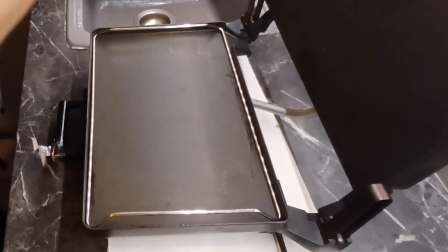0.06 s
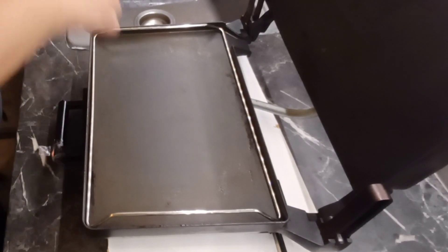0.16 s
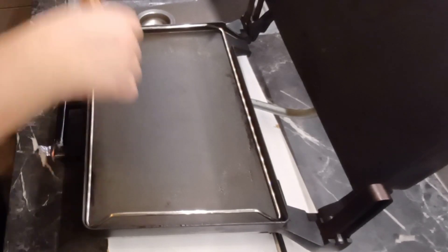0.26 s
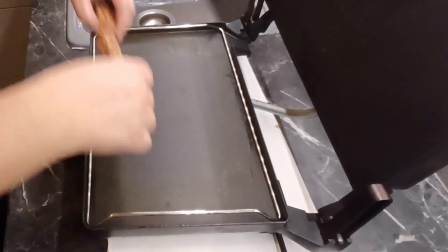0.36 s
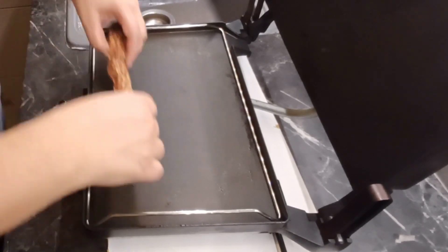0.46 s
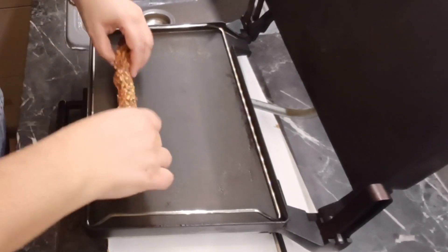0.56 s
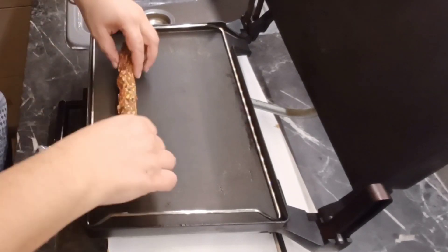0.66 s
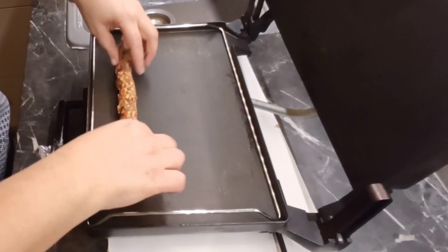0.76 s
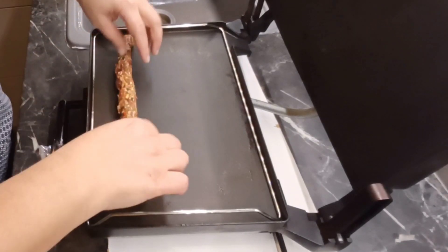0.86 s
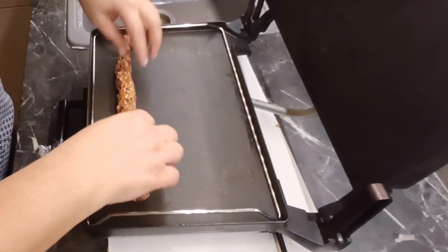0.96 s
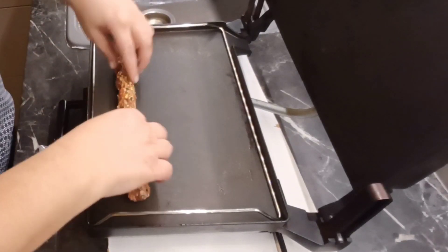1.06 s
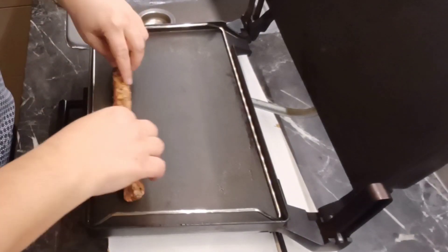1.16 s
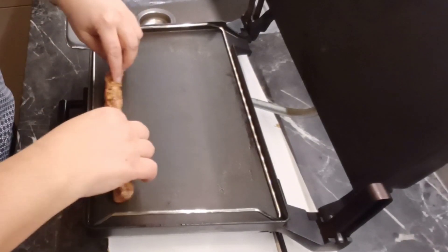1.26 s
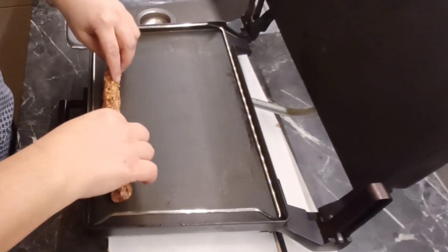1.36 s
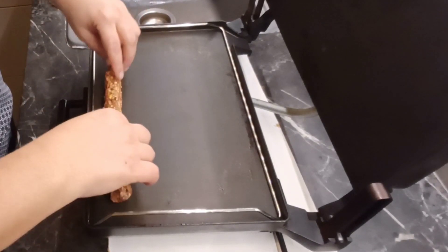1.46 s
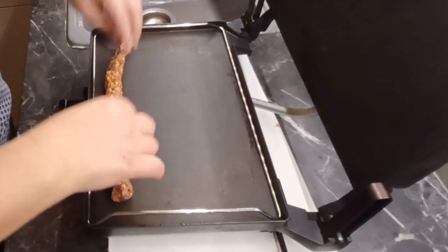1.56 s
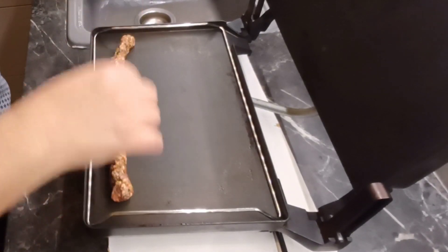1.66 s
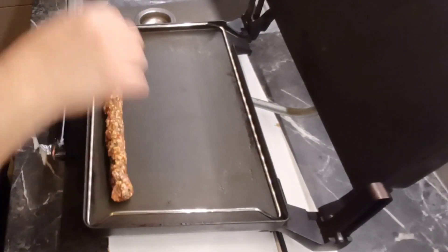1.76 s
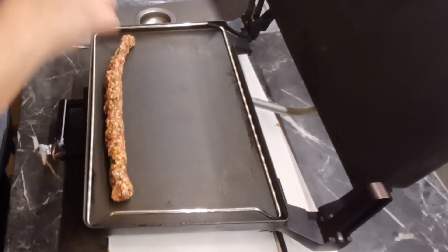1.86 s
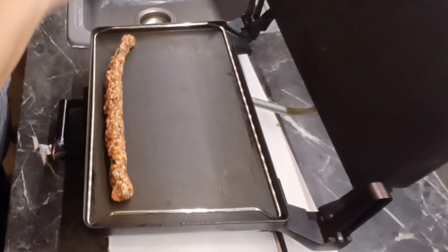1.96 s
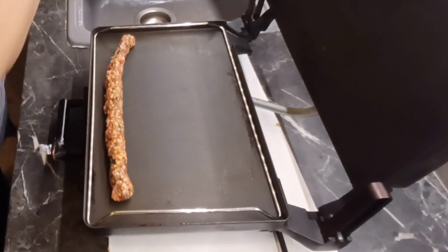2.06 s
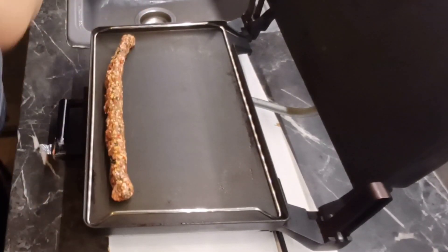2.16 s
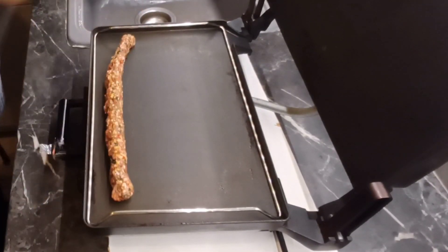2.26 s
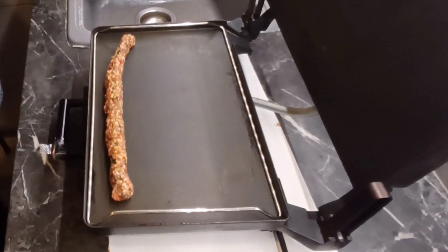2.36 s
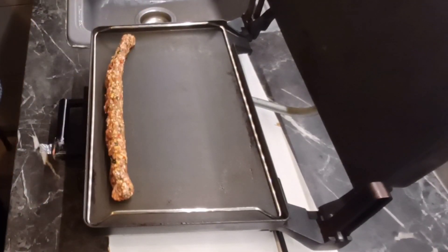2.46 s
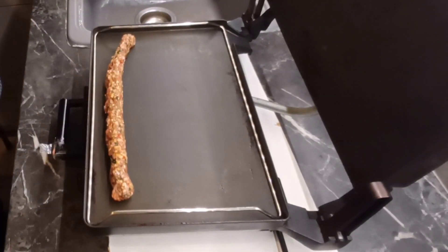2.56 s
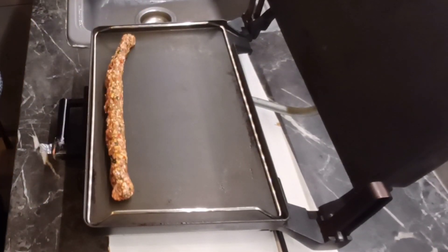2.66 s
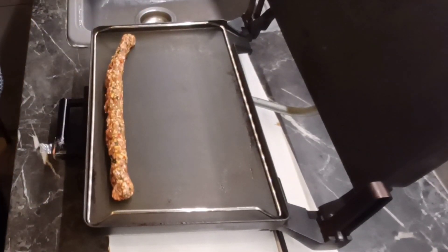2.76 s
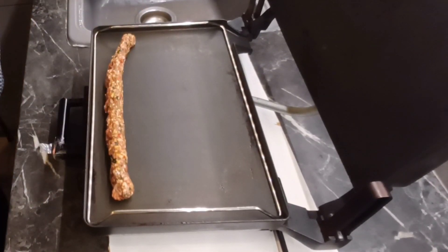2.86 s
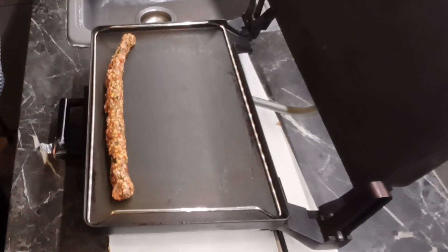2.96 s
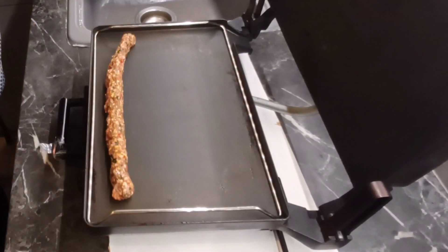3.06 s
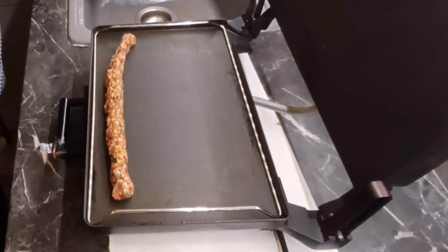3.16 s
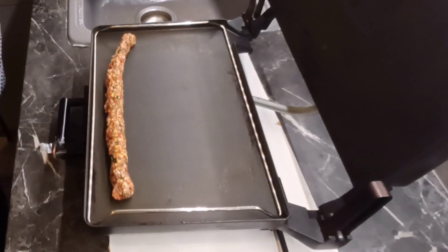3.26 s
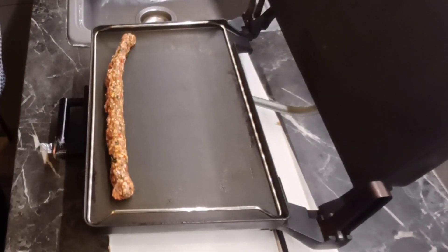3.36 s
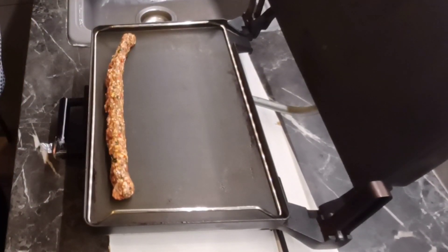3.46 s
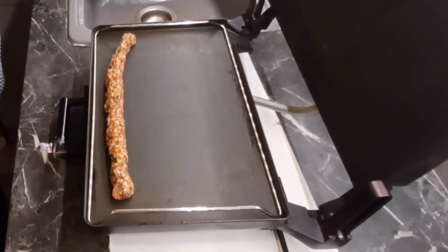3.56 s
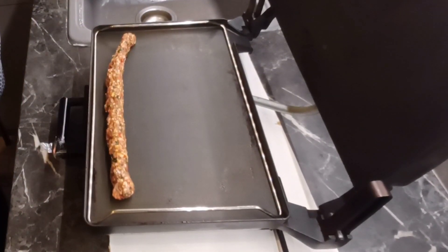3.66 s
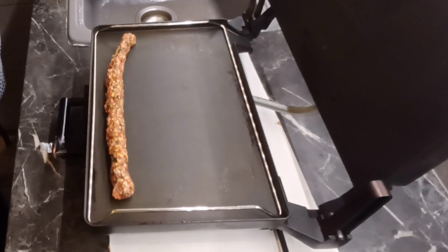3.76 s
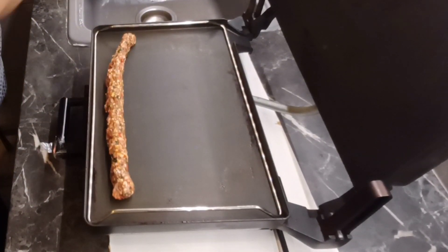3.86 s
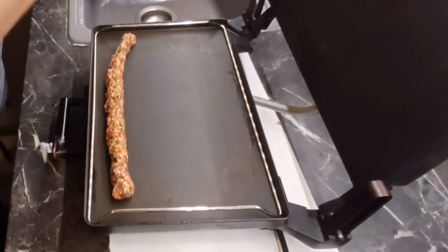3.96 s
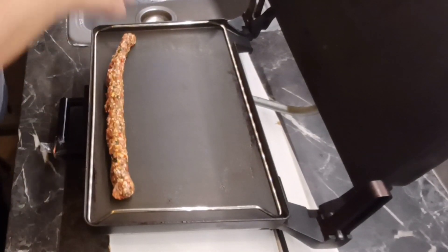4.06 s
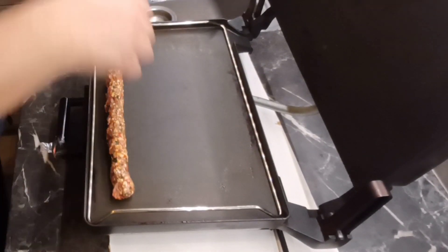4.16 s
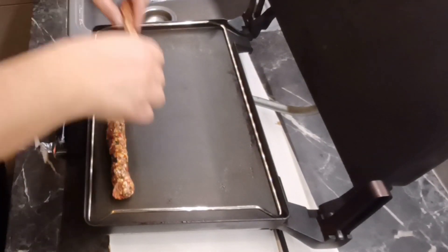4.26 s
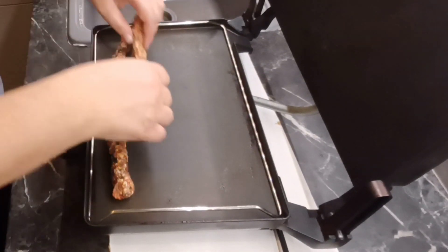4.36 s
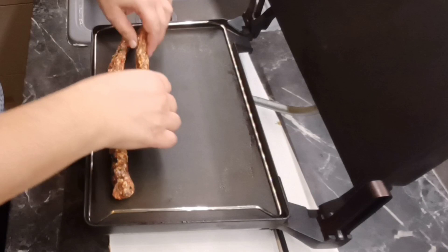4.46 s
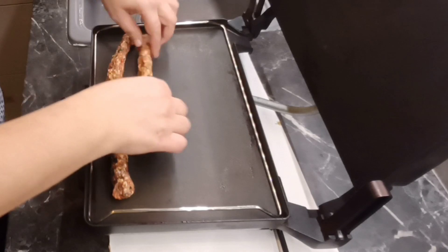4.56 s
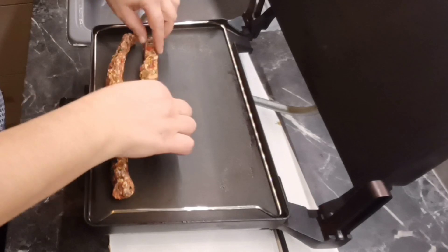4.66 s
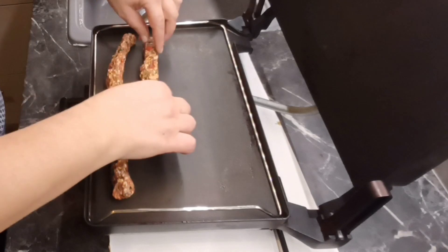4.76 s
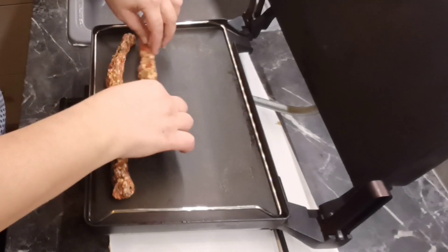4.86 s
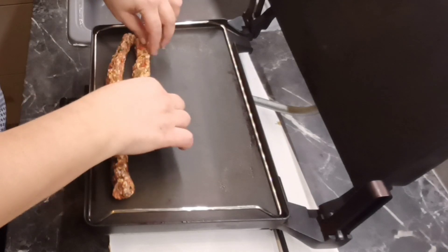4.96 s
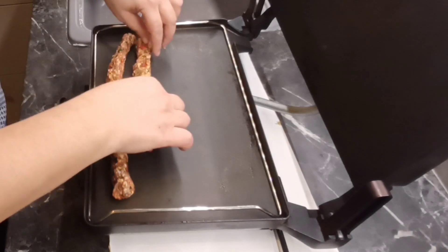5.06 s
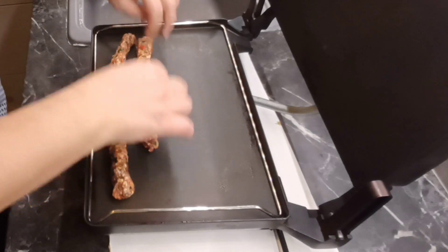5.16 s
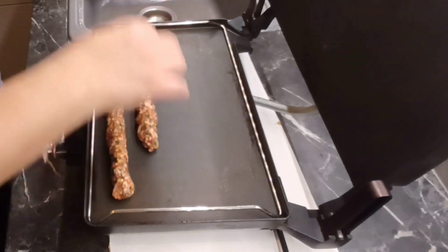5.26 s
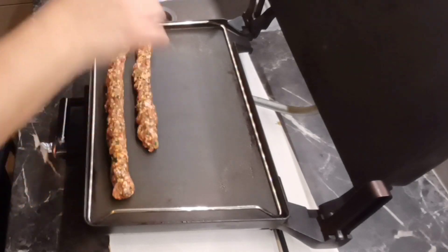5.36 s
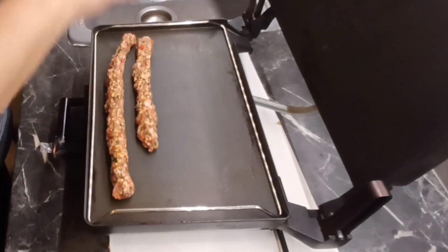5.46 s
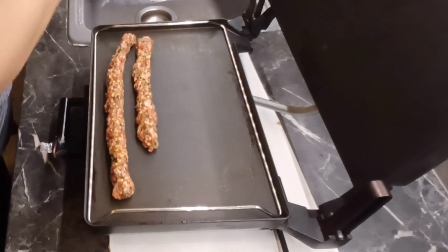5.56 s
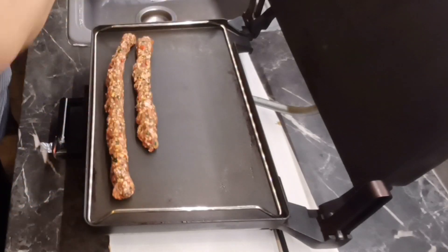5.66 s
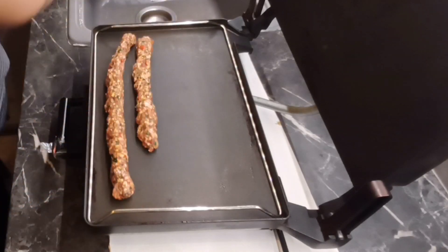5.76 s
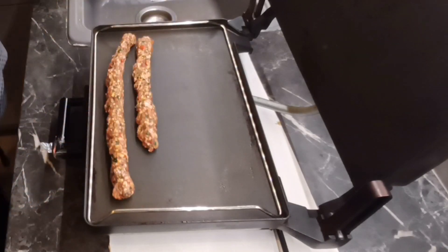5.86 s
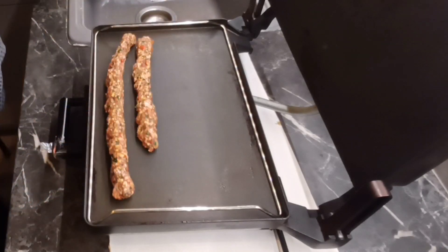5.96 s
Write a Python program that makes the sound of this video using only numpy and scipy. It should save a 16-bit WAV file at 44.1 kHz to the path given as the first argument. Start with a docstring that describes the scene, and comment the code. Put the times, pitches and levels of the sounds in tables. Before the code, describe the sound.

Near silence, then raw minced meat touches a hot grill plate and a bright, crackling sizzle swells, growing fuller as a second roll is laid.

```python
"""Minced meat on a hot grill

Two rolls of raw minced meat are laid on the hot flat plate of an electric grill in a quiet kitchen.
Thousands of tiny steam bursts, coloured and swelling as each roll is laid, make the sizzle; sharp bursts
and lower ticks make the pops and fat snaps. Hands press the meat: rounded low thuds and thin held tones.
Shaped noise gives the kitchen air, a grill murmur that follows the boil, and a few faint rustles.
"""
import sys
import numpy as np
from scipy import signal
from scipy.fft import rfft, irfft
from scipy.io import wavfile
from scipy.ndimage import uniform_filter1d

SR = 44100
rng = np.random.default_rng(int(sys.argv[2]) if len(sys.argv) > 2 else 0)


def log_audio(samples):
    """Write samples as a 16-bit WAV file to the path given in sys.argv[1]."""
    # one column per channel
    frames = np.atleast_2d(samples).T
    # limit to full scale, then quantise
    limited = np.clip(frames, -1, 1)
    pcm = np.round(limited * 32767).astype(np.int16)
    wavfile.write(sys.argv[1], SR, pcm)


N = 265482  # length in samples

# Colour of the kitchen air. Each row: frequency in Hz, relative level in dB per Hz.
ROOM_COLOUR = [(15, -57), (25, -32), (43, -16), (64, -3.5), (82, -8.5), (107, -4), (174, -13), (526, -18.5),
               (878, -25), (5060, -34.5), (6630, -42.5), (11700, -34), (15700, -35)]
ROOM_DB = -74.5  # rms level

# Colour of the grill body shaken by the boiling. Each row: frequency in Hz, relative level in dB per Hz.
RUMBLE_COLOUR = [(15, -44), (25, -20), (46, -7.5), (60, 2.5), (86, -6.5), (119, -2), (195, -8.5), (337, -5),
                 (450, -10.5), (580, -9.5), (990, -120)]
RUMBLE_DB, RUMBLE_FOLLOW = -55, 0.61  # base level in dB, and dB of rumble for each dB of boil

# Hands on the meat shake the grill more. Each row: middle in seconds, length in seconds, lift in dB.
HANDLING = [(0.868, 0.65, 7.5), (1.4, 0.7, 5), (4.7, 0.53, 3)]

# Faint coloured rustles, the last one steam escaping at first contact.
# Each row: start in seconds, end in seconds, centre in Hz, width in Hz, level in dB.
RUSTLES = [(0.005, 0.06, 2200, 2400, -84), (0.14, 0.2, 5000, 1500, -88), (0.635, 0.82, 2050, 650, -63.5)]

# Hands pressing meat onto the plate. Each row: start in seconds, level in dB, pitch in Hz, length in seconds.
PRESSES = [(0.64, -68, 111, .05), (0.745, -63, 60, 0.052), (0.775, -60, 95, .05), (0.814, -45, 81, 0.067),
           (0.858, -47.5, 96, .055), (0.91, -56, 88.5, 0.032), (0.945, -63, 114, 0.069),
           (4.602, -58, 85, 0.048), (4.695, -60, 119, 0.04), (4.704, -58, 82, .06), (4.752, -64, 99, 0.04),
           (4.822, -62, 90, 0.034)]

# Overtones of a thud. Each row: multiple of the pitch, level in dB.
THUD_OVERTONES = [(1, 0), (1.6, -12), (2.5, -20)]

# Thin tones held while the first roll is pressed down.
# Each row: start in seconds, end in seconds, pitch in Hz, level in dB.
HELD_TONES = [(0.712, 1.062, 312, -67.5), (0.877, 1.22, 758, -68), (1.426, 1.556, 306, -72)]

# Sharp high pops: four faint ticks ahead of the boil, then large steam pockets bursting.
# Each row: start in seconds, level in dB, pitch in Hz, left minus right in dB.
POPS = [(0.1514, -71, 4980, -1), (0.2794, -67, 11700, -2), (0.3624, -72, 11400, 0),
        (0.5357, -66, 12700, -4), (0.9782, -25, 12500, -1), (1.724, -12.5, 12600, -6),
        (1.8004, -19, 13100, -3), (1.8244, -19, 13300, -3), (1.9494, -20, 12900, -2),
        (1.9684, -15, 10500, -3), (2.9647, -15, 11700, -1), (3.676, -16.5, 12600, -1),
        (4.0826, -17, 13000, -1)]

# Fat drops snapping with a lower tick. Each row: start in seconds, level in dB, pitch in Hz.
FAT_SNAPS = [(1.505, -31, 3500), (1.953, -30, 4000), (2.19, -30, 4000), (2.885, -29, 4200),
             (2.918, -30, 3600), (3.758, -31, 3500), (5.2788, -27.5, 1650), (5.72, -28, 4200),
             (5.793, -27, 2100)]

# Broad colour of the sizzle. Each row: frequency in Hz, relative level in dB per Hz.
SIZZLE_COLOUR = [(180, -56), (300, -53), (545, -31), (700, -20), (1050, -21.5), (1330, -12), (2420, -10.5),
                 (3540, -7.5), (4930, -5.5), (6110, -7), (8510, -3.5), (11800, 1), (13800, 0.5),
                 (15700, -1.5)]

# Plate resonances that lift the sizzle. Each row: centre in Hz, width in Hz, lift in dB.
PLATE_RESONANCES = [(807, 55, 4.5), (1028, 18, 5.5), (1770, 80, 3.5), (3680, 640, 2.5), (5570, 620, 2),
                    (7200, 530, 2)]

# What the two ears hear of the sizzle. Each row: frequency in Hz, likeness from 0 to 1, left minus right in dB.
EARS = [(170, 0.27, -1.4), (690, 0.4, -5.6), (1030, 0.1, -1.4), (1550, 0.42, -1.9), (2200, 0.49, -0.9),
        (2750, 0.08, -2.7), (4200, 0.31, -4.3), (5000, 0.03, -1.6), (6100, 0.45, -2.4), (7400, 0.3, -6.7),
        (8600, 0.02, -1.5), (11200, 0.4, -3.2), (13200, 0.32, -1.0), (15000, 0.33, 0.1)]
EAR_LAG_S = 58e-6  # delay of the shared bursts at the right ear, as the left is nearer to the meat

# Rolls laid on the plate.
# Each row: first touch in seconds, time to lay it full length in seconds, full boil in dB, low end in dB.
ROLLS = [(0.57, 0.91, -25.5, -2), (4.497, 0.72, -28.5, 0.5)]
SPREAD_POWER = 1.11  # loudness grows with the laid length, to this power
TIP_SHARE, TIP_S = 0.016, 0.015  # the tip lands first: share of the roll, and seconds to land
DRYING_DB_PER_S = -0.31  # the boil eases as the surface dries
LOW_LATE_DB, LOW_LATE_S = -35, 0.1  # large bubbles come late: low end at first touch, and its time constant

# The boil surges or slackens for a moment.
# Each row: middle in seconds, length in seconds, change in dB, further change of the low end in dB.
SURGES = [(1.16, 0.12, 2.5, 1.3), (1.334, 0.49, -3, -1.5), (1.96, 0.1, 2.5, 0.5), (4.55, 0.47, -1.75, 2),
          (4.89, 0.11, 0.3, 0.5)]

EDGE_HZ = 15760  # top of the band


def amp(db):
    """Turns decibels into gain."""
    return 10 ** (np.asarray(db) / 20)


def evened(x):
    """Scales to rms 1."""
    return x / np.sqrt(np.mean(x ** 2) + 1e-20)


def read(points, hz, column=1):
    """Reads one column of a table between its points, on a log-frequency axis."""
    table = np.transpose(points)
    return np.interp(np.log(hz + 1), np.log(table[0] + 1), table[column])


def add(mix, start, sound):
    """Mixes a sound in at a start in seconds, cutting what runs past the end."""
    part = mix[:, round(start * SR):][:, :sound.shape[-1]]
    part += sound[:, :part.shape[-1]]


def highpass(x, order, hz):
    """Takes away the bass below a corner frequency."""
    return signal.sosfilt(signal.butter(order, hz, "high", fs=SR, output="sos"), x)


def hump(t, middle, length):
    """A smooth rise and fall from 0 to 1 and back."""
    return np.cos(np.pi * np.clip((t - middle) / length, -.5, .5)) ** 2


def kitchen(x, t60, wet_db):
    """Direct sound plus a dense tail of reflections that falls 60 dB in t60 seconds, another for each ear."""
    t = np.arange(SR // 4) / SR
    tail = rng.standard_normal((2, len(t))) * amp(-60 * t / t60) * (t > .001)
    tail *= amp(wet_db) / np.linalg.norm(tail[0])
    return x + signal.fftconvolve(x, tail, axes=1)[:, :N]


def noise(colour, likeness):
    """Steady two-ear noise of a given colour, rms 1; likeness is how much the ears share."""
    left, other = rng.standard_normal((2, N))
    right = likeness * left + np.sqrt(1 - likeness ** 2) * other
    hz = np.fft.rfftfreq(N, 1 / SR)
    return evened(irfft(rfft(np.array([left, right])) * amp(read(colour, hz)), N))


def boil(t, low):
    """Level in dB of all rolls boiling together; low is how much a band belongs to the large bubbles."""
    power = 1e-12
    for touch, laying, full_db, low_db in ROLLS:
        since = np.maximum(t - touch, 0)
        tip = TIP_SHARE * np.minimum(since / TIP_S, 1)
        laid = np.minimum(since / laying + tip, 1) ** SPREAD_POWER
        dried_db = full_db + DRYING_DB_PER_S * np.maximum(since - laying, 0)
        low_end_db = low_db + LOW_LATE_DB * np.exp(-since / LOW_LATE_S)
        power = power + (laid * amp(dried_db + low * low_end_db)) ** 2
    surge_db = sum((db + low * low_db) * hump(t, s, length) for s, length, db, low_db in SURGES)
    return 10 * np.log10(power) + surge_db


def room_air():
    """Steady low noise of the kitchen air, nearly independent at the two ears."""
    return amp(ROOM_DB) * noise(ROOM_COLOUR, 0.15)


def rumble():
    """Low murmur of the grill body, following the boil and the hands, coming in lumps."""
    t = np.arange(N) / SR
    smoothed = uniform_filter1d(rng.standard_normal(N), size=1500)
    lumps = evened(uniform_filter1d(smoothed, size=1500))
    hands_db = sum(db * hump(t, s, length) for s, length, db in HANDLING)
    level_db = RUMBLE_DB + RUMBLE_FOLLOW * boil(t, 0) + hands_db + 1.4 * lumps
    return noise(RUMBLE_COLOUR, 0.45) * amp(level_db)


def rustles():
    """Short puffs of band-limited noise that swell in and out."""
    out = np.zeros((2, N))
    for start, end, hz, width, db in RUSTLES:
        air = rng.standard_normal((2, round((end - start) * SR)))
        band = signal.butter(2, [hz - width / 2, hz + width / 2], "band", fs=SR, output="sos")
        puff = evened(signal.sosfilt(band, air))
        add(out, start, amp(db) * puff * np.hanning(air.shape[1]))
    return out


def press_thuds():
    """Soft meat pushes the plate slowly, so each low thud and its overtones swell in and out."""
    out = np.zeros((2, N))
    for start, db, hz, length in PRESSES:
        t = np.arange(round(length * SR)) / SR
        ring = sum(amp(part_db) * np.sin(2 * np.pi * k * hz * t) for k, part_db in THUD_OVERTONES)
        add(out, start, amp(db) * np.hanning(len(t)) * ring * amp([[-1.4], [1.4]]))
    return out


def held_tones():
    """Thin wavering sines that come and go under the fingers."""
    out = np.zeros((2, N))
    for start, end, hz, db in HELD_TONES:
        t = np.arange(round((end - start) * SR)) / SR
        drift = evened(uniform_filter1d(rng.standard_normal(SR), size=900))[:len(t)]
        swell = signal.windows.tukey(len(t), .7)
        tone = amp(db + 1.5 * drift) * np.sin(2 * np.pi * hz * t) * swell
        add(out, start, tone * np.ones((2, 1)))
    return out


def burst(hz, cycles, size=400):
    """A small sharp burst: a few cycles that die fast, peak 1."""
    turns = hz * np.arange(size) / SR
    wave = np.sin(2 * np.pi * turns) * np.exp(-3 * turns / cycles)
    return wave / abs(wave).max()


def pops():
    """Each pop or faint tick is a sharp burst, a second one 1.2 ms later, and a short spray."""
    out, t = np.zeros((2, N)), np.arange(400) / SR
    for start, db, hz, pan_db in POPS:
        crack = burst(hz, 6.0)
        second = .8 * np.roll(crack, round(.0012 * SR))
        # differencing twice leaves mostly treble
        spray = .25 * np.diff(rng.standard_normal((2, 402)), 2) * amp(-60 * t / .02)
        pan = amp([[pan_db / 2], [-pan_db / 2]])
        add(out, start, amp(db) * pan * (crack + second + spray))
    return highpass(out, 2, 2500)


def fat_snaps():
    """Fat drops snap with a lower tick of few cycles, slightly to the right."""
    out = np.zeros((2, N))
    for start, db, hz in FAT_SNAPS:
        add(out, start, amp(db) * burst(hz, 1.7) * amp([[-1.2], [1.2]]))
    return out


def spits(per_s, lift, t60):
    """Gain of the fizz as droplets land on the plate: flares of a few milliseconds, mean power 1."""
    hits = (rng.random(N) < per_s / SR) * np.minimum(rng.exponential(1, N), 3)
    flares = signal.lfilter([1], [1, -amp(-60 / t60 / SR)], hits)
    return evened(1 + lift * flares)


def bubbles(per_s, spread_db, cycles):
    """Spectra of three patches of steam bursts in eight sizes, a few strong; flat in colour overall."""
    shapes = [rfft(evened(burst(hz, cycles)), N) for hz in np.geomspace(600, 15000, num=8)]
    patches = 0
    for shape in shapes:
        happens = rng.random((3, N)) < per_s / SR  # per_s counts bursts of each size in each patch
        strength = np.minimum(rng.exponential(1, (3, N)), 3.2)
        patches = patches + shape * rfft(happens * amp(spread_db * strength))
    return patches / np.sqrt(sum(abs(shape) ** 2 for shape in shapes))


def fizz():
    """Steady coloured steam bursts, rms 1: one patch reaches both ears, the others one each."""
    hz = np.fft.rfftfreq(N, 1 / SR)
    both, left, right = bubbles(2300, 1.8, 1.32)
    share = np.clip(read(EARS, hz), 0, 1)
    lag = np.exp(-2j * np.pi * hz * EAR_LAG_S)
    lean = amp(read(EARS, hz, column=2) / 2)
    left = (np.sqrt(share) * both + np.sqrt(1 - share) * left) * lean
    right = (np.sqrt(share) * both * lag + np.sqrt(1 - share) * right) / lean
    resonance_db = sum(db / (1 + (2 * (hz - centre) / width) ** 2)
                       for centre, width, db in PLATE_RESONANCES)
    colour = amp(read(SIZZLE_COLOUR, hz) + resonance_db) * (hz > 150)
    return evened(kitchen(irfft(np.array([left, right]) * colour, N), .2, -13))


def sizzle():
    """Fizz whose bands each follow the boil, the low ones late, and flicker in level and colour."""
    f, t, z = signal.stft(fizz(), SR, nperseg=256, noverlap=192)
    chance = rng.standard_normal((len(f), len(t)))
    across_bands = uniform_filter1d(chance, size=4, axis=0)
    colour_drift = evened(uniform_filter1d(across_bands, size=30, axis=1))
    flicker = evened(uniform_filter1d(rng.standard_normal(len(t)), size=8))  # shared by all bands
    low = np.clip(np.log(9000 / (f + 1)) / np.log(8), 0, 1.5)[:, None]
    z = z * amp(boil(t, low) + 0.88 * colour_drift + 0.11 * flicker)
    return signal.istft(z, SR, nperseg=256, noverlap=192)[1][:, :N]


def scene():
    """Mixes the sources, from the kitchen air up to the sizzle."""
    background = room_air() + rumble() + rustles()
    hands = press_thuds() + held_tones()
    small_sources = highpass(pops() + fat_snaps(), 3, 650)  # small sources radiate no bass
    near = kitchen(small_sources, .06, -8)
    boiling = sizzle() * spits(50, .3, .015)
    return background + hands + near + boiling


def record(dry):
    """Limits the band with a steep low-pass at EDGE_HZ."""
    lowpass = signal.firwin(2047, EDGE_HZ, window=("kaiser", 10), fs=SR)
    return signal.oaconvolve(dry, lowpass[None], "same")


dry = scene()
out = record(dry)
log_audio(out)
```